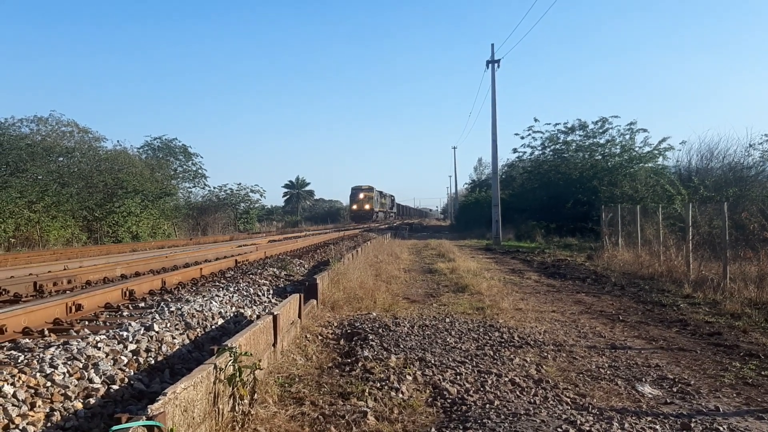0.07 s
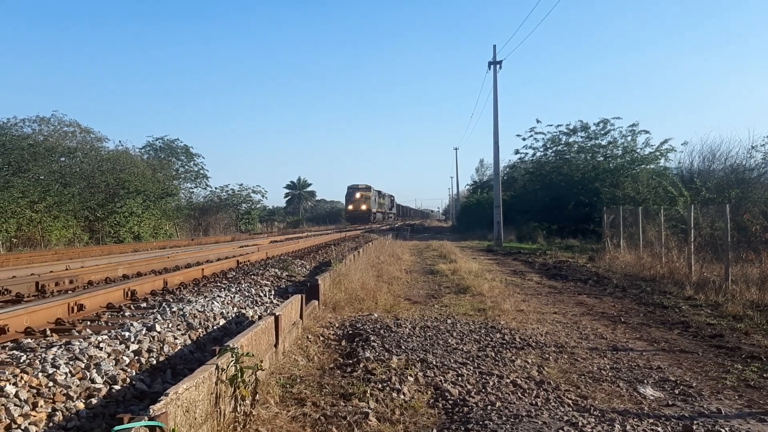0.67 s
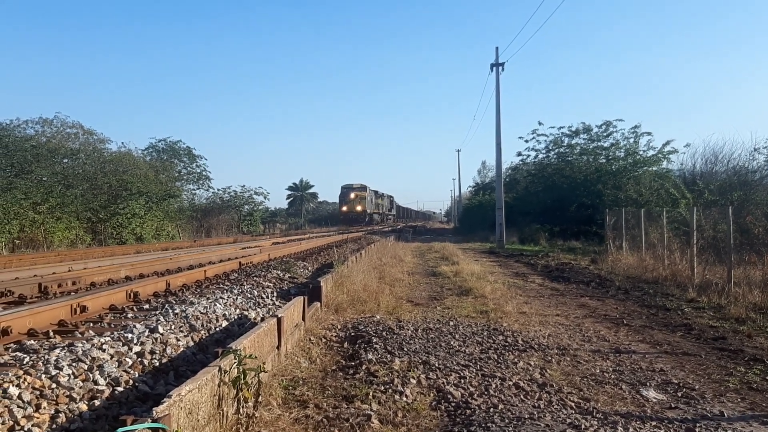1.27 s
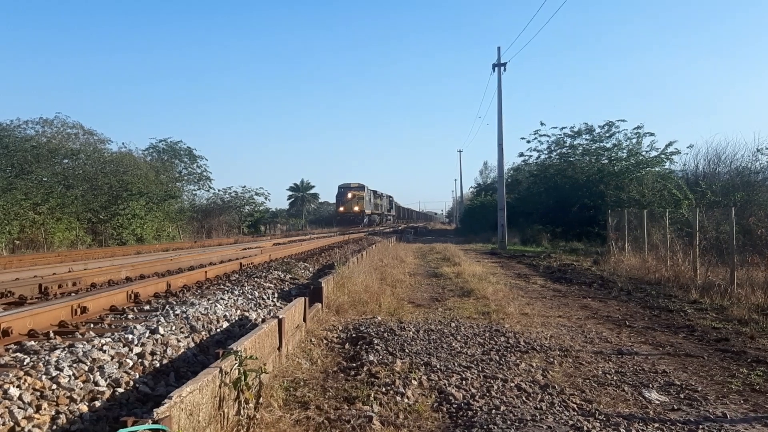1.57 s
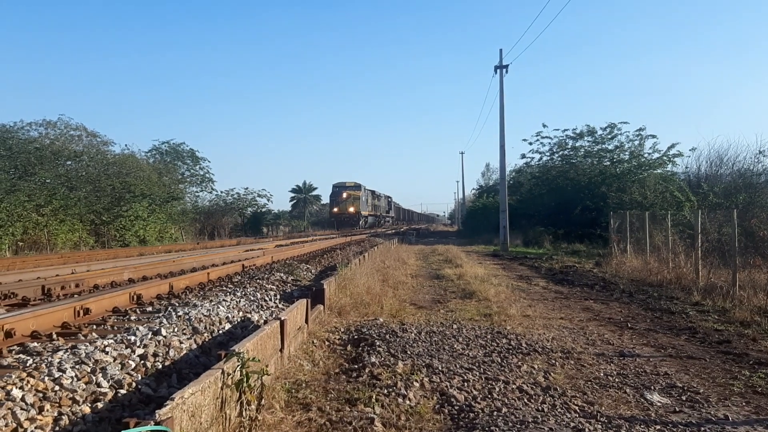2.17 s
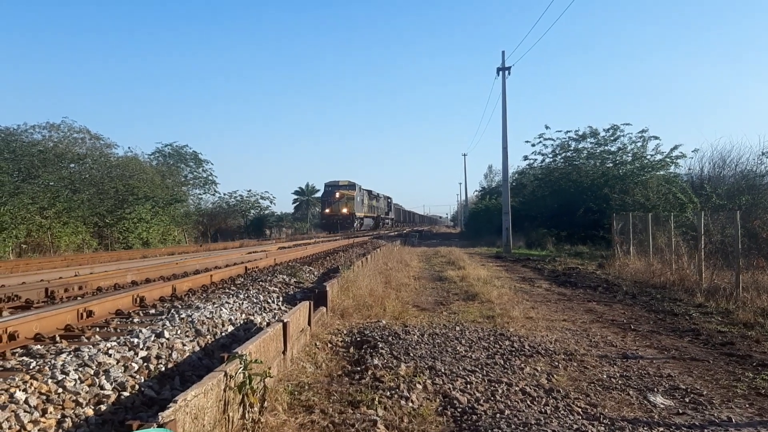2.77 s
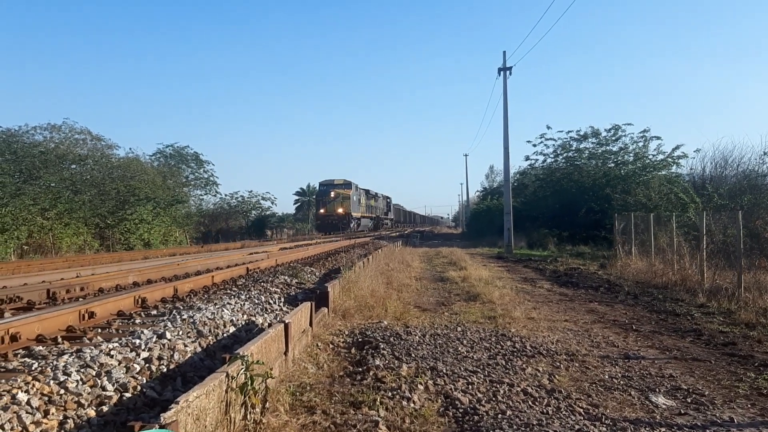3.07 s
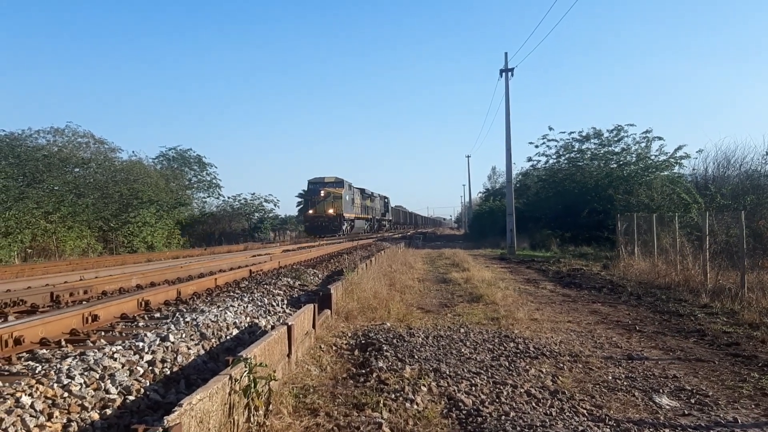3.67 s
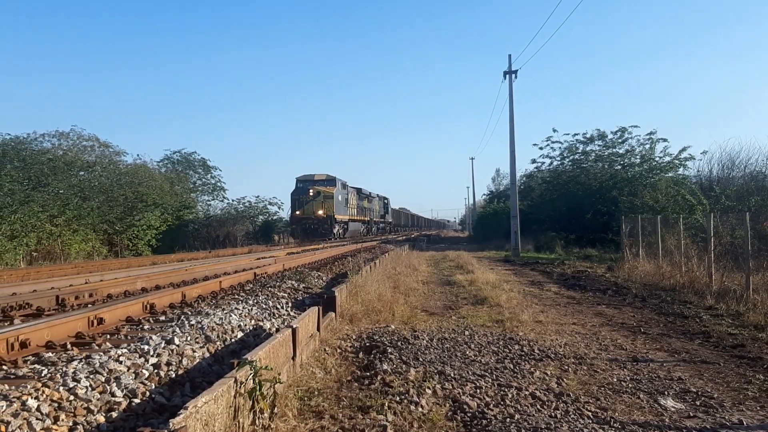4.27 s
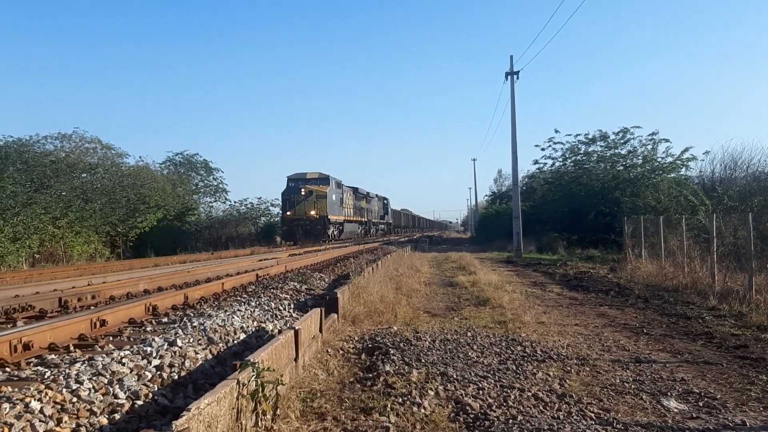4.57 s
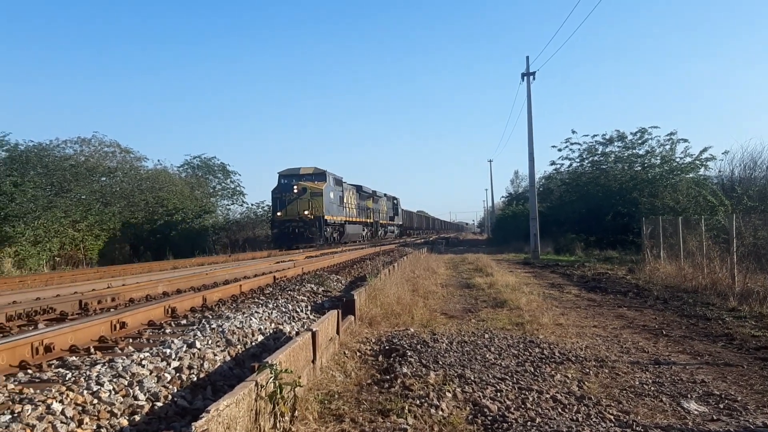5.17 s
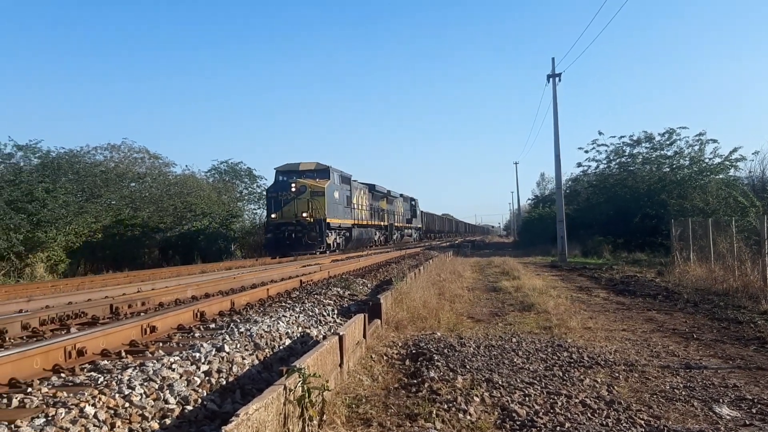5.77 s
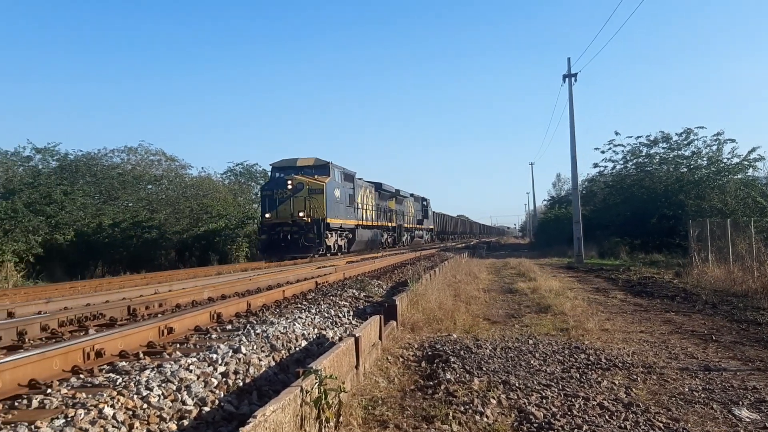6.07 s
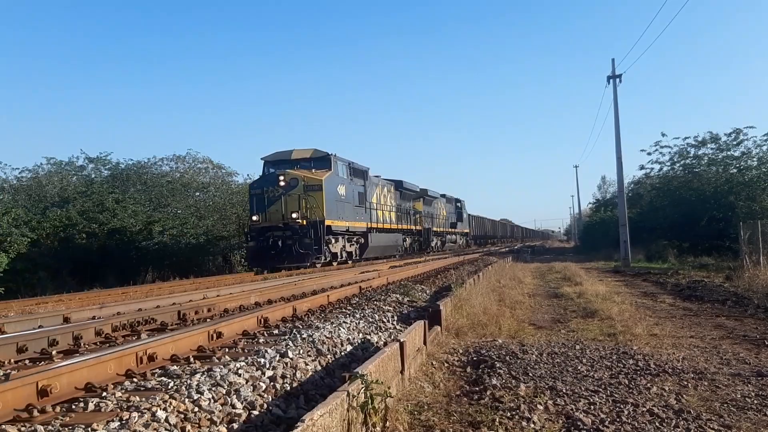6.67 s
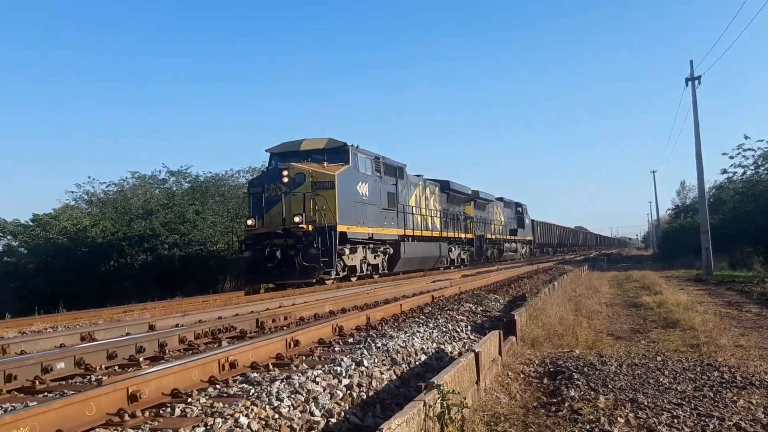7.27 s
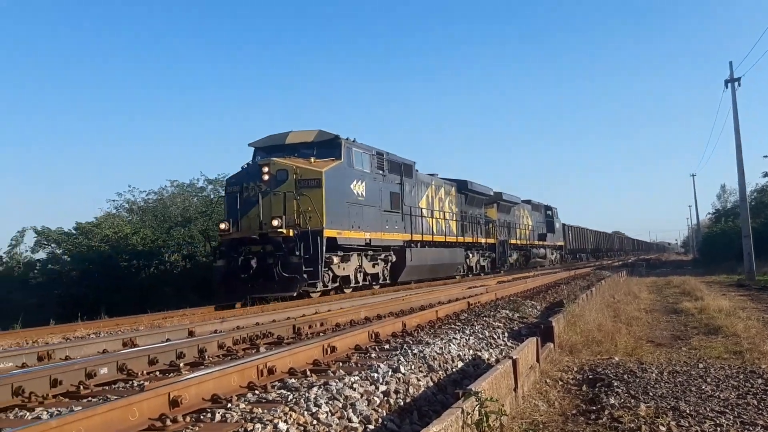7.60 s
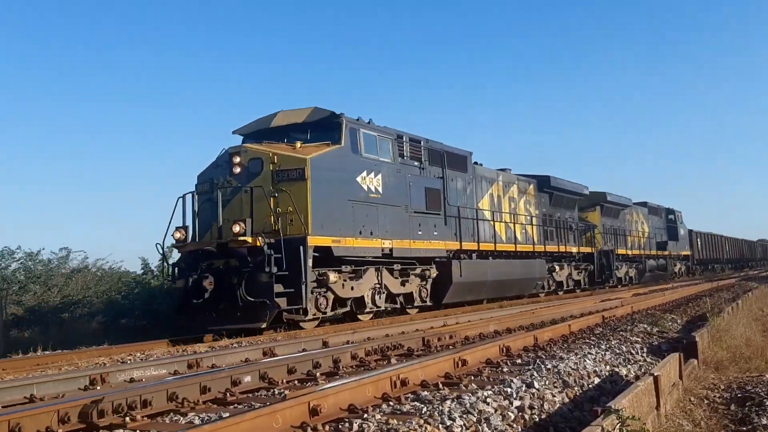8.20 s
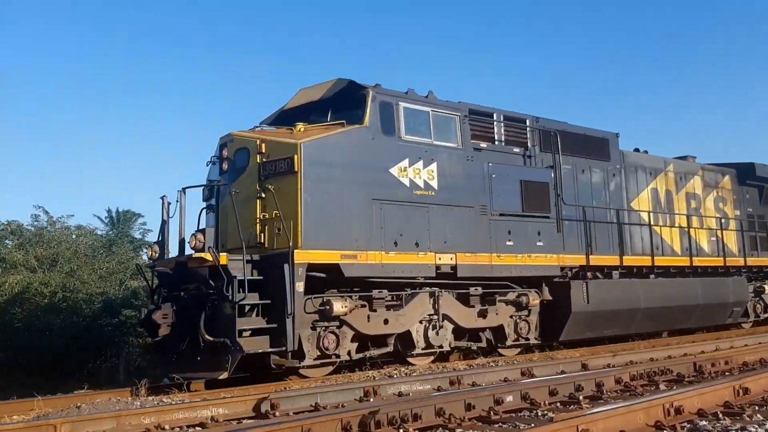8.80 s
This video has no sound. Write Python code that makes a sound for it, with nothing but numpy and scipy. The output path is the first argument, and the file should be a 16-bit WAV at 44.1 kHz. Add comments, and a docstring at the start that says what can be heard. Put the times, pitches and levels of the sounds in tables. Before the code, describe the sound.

A locomotive bell clangs at an even pace, distant and echoing at first, then close and sharp as a freight train nears. Beneath it, a throbbing diesel engine and roaring wheels grow louder. A short far-off air hiss comes first, then one faint bird chirp, and later rail ticks, a soft gear whine and a quick steel scrape. The microphone stands in the open by the track, rumbling and thumping in the wind.

```python
"""A diesel freight train rolls closer, its bell struck every 0.7 s and echoing off bushes and stones.
Its exhaust throbs, its wheels roar and wind buffets the microphone throughout. Right at the start
an air valve spits far off. Just after 3 s a bird chirps, and from 4.4 s the rails tick under the load.
The gears start to whine after 6 s, the bell is much louder from 6.9 s, and at 8.2 s a wheel scrapes."""
import sys
import numpy as np
from scipy import signal
from scipy.fft import rfft, irfft
from scipy.io import wavfile
from scipy.ndimage import map_coordinates

SR = 44100
rng = np.random.default_rng(int(sys.argv[2]) if len(sys.argv) > 2 else 0)


def generate_wav(sig):
    """Save sig (samples, or channels by samples) to the path in sys.argv[1] as 16-bit PCM at SR."""
    pcm = np.round(np.clip(np.atleast_2d(sig).T, -1, 1) * 32767).astype(np.int16)
    wavfile.write(sys.argv[1], SR, pcm)


N = 389844
TIME, FREQS = np.arange(N) / SR, np.fft.rfftfreq(N, 1 / SR)
NEAR_M = 20  # wheel and engine levels are set for this distance

# Bell strokes, each coloured by its path over the ground (hum and prime are the two lowest tones):
# start_s, level_db, hum_boost_db, prime_boost_db, treble_boost_db
BELL_STROKES = [(-.11, -42.5, 0.5, -7, -8), (.585, -48.5, 4, -3, 2), (1.287, -46.5, 0.5, 2, 1.5),
                (1.982, -43, -5, -1, -2.5), (2.675, -35.5, -6, -6.5, -2), (3.38, -35, 0, -8, 0),
                (4.076, -31.5, -0.5, -2.5, 2), (4.781, -30, 1, -2.5, 3), (5.485, -28.5, 7.5, 0, 1.5),
                (6.179, -27.5, 11, 1.5, 1.5), (6.887, -14.5, -1.5, -1.5, -2.5), (7.578, -12, -1, -0.5, 4),
                (8.283, -14.5, 6.5, 7.5, 1.9)]
# The tones that make up the bell's ring: pitch_hz
BELL_PITCHES = [966, 2014, 2257, 2246, 2310, 2420, 3430, 3915, 4109, 5298, 5695, 5776, 5904, 5959, 7412,
                8288, 10790]
# How each tone rings (t60 is the time to fade by 60 dB): level_db, t60_s, left_minus_right_db
BELL_RINGS = [(-19, 2.28, -1), (-2, 0.51, 0), (-1.5, 0.51, -1), (-18.5, 1.36, -20), (-1.5, 0.11, 10.5),
              (0.5, 0.025, 11), (-10.5, 0.32, 0), (-5.5, 0.57, -5), (-22, 0.34, -19), (-13.5, 0.085, -5),
              (-20, 0.12, -7), (-22, 0.3, -8), (-11.5, 0.17, -14), (-11, 0.21, 10), (-23, 0.1, -12),
              (-27.5, 0.14, -13), (-30, 0.13, 5)]
# Crowds of close overtones that die quickly: pitch_hz, width_hz, level_db
BELL_SHIMMER = [(2360, 160, -5), (3790, 820, 5.5), (5810, 450, 6), (7130, 230, -13), (8240, 120, -19.5),
                (10400, 810, -39)]
# Echoes from bushes; those behind the moving train sound lower: delay_s, pitch_ratio, level_db, t60_s
BUSH_ECHOES = [(0, 1, 0, .38), (.04, .996, -8, 1.0), (.12, .99, -12, 2.0)]


def bell(near_db=-13, shimmer_s=.039, clank_s=.0056, bloom_s=.021, flutter_hz=75, smear_hz=90):
    """A clapper clanks on bronze; the further off the bell, the more of it arrives as echoes."""
    out, t = np.zeros((2, N)), TIME[:SR]
    hz = np.array(BELL_PITCHES)
    tone_db, t60, tone_pan_db = np.transpose(BELL_RINGS)
    attack = 1 - np.exp(-t / .0015)
    ring = np.exp(2j * np.pi * hz[:, None] * t) * undb(-60 * t / t60[:, None]) * attack
    crowd = sum(abs(resonances([(f, width, 0)])) ** 2 * undb(db) for f, width, db in BELL_SHIMMER)
    shimmer = stereo_noise(crowd, .34)
    clank_spectrum_db = over_hz([(900, -40), (2200, 1), (5500, -11), (10500, -.5), (15000, -40)])
    clank = stereo_noise(undb(clank_spectrum_db), .27)
    for start_s, db, hum_db, prime_db, treble_db in BELL_STROKES:
        far_db = near_db - db  # how much weaker than a nearby stroke
        air_loss_db = .75 * far_db  # air dulls distant strokes
        stroke_db = tone_db + treble_db * (hz > 3000) - air_loss_db * (hz > 7000)
        stroke_db[:2] += hum_db, prime_db
        # shifting paths over the ground make each tone flutter
        depth = .27 + .01 * far_db
        sway = [np.exp(2j * np.pi * rng.random()) * (1 + depth * flutter(t, flutter_hz)) for _ in hz]
        tones = undb(stroke_db)[:, None] * np.imag(ring * np.array(sway))
        direct = pan(tone_pan_db) @ tones
        piece = rng.integers(N - SR) + np.arange(SR)  # fresh noise for each stroke
        shimmer_db = -11 + .16 * far_db + .5 * treble_db
        direct += undb(shimmer_db) * shimmer[:, piece] * np.exp(-t / shimmer_s) * attack
        direct += undb(-22 - 2 * air_loss_db) * clank[:, piece] * np.exp(-t / clank_s) * attack
        echo_gain = undb(-14 + .79 * far_db)
        gain = undb(db) * pan(1.5 - .2 * far_db) / np.sqrt(1 + .5 * echo_gain ** 2)
        # a far stroke swells in: its straight path is weak and paths over the stones arrive later
        bloom = 1 - np.clip(.11 * (far_db - 14), 0, .9) * np.exp(-t / bloom_s)
        add(out, start_s, gain * direct * bloom)
        for delay_s, pitch_ratio, echo_db, echo_t60 in BUSH_ECHOES:
            shifted = np.interp(t * pitch_ratio, t, direct.mean(axis=0))
            echo = undb(echo_db) * scatter(shifted, echo_t60)
            # the train's motion shifts the pitch differently for each bush, so the echoes waver
            smear = 1 + .38 * flutter(t, smear_hz).real
            add(out, start_s + delay_s, gain * echo_gain * echo * smear)
    return out


# The tone colour of wheels on rails, with faint microphone hiss at the very top: pitch_hz, level_db
WHEEL_SPECTRUM = [(250, 7.5), (400, 1.5), (560, 0.5), (750, 2.5), (1100, 0), (1500, -1.5), (1900, 3),
                  (2400, -4.5), (2900, -9), (3900, -7.5), (4800, -12), (6800, -19), (8200, -40.5),
                  (11000, -38.5), (15000, -38.5)]
# Rails sound along their whole length, so the treble differs between the ears: pitch_hz, likeness_ratio
WHEEL_LIKENESS = [(250, .85), (650, .9), (1400, .75), (2300, .4), (3000, .1), (6000, .05), (12000, 0)]
# The wheels' roar, ring, hiss and sizzle: near_level_db, ground_loss_db_per_m, far_wagons_db
WHEEL_BANDS = [(-32.5, .225, -57), (-35, .18, -65), (-35, 0.19, -55), (-56.5, 0.11, -84)]


def wheels(jolt_db=1.5, flicker_db=1.23, bushes_db=-2, clears_bushes_s=2.42):
    """Rough wheels shake the rails; the front of the train grows louder over the far wagons."""
    edges_hz = [200, 1000, 2300, 7800, 16000]
    out, shape, likeness = 0, undb(over_hz(WHEEL_SPECTRUM)), over_hz(WHEEL_LIKENESS)
    metres, jolts = distance(), wander(5)
    for low, high, (near_db, loss_db_per_m, wagons_db) in zip(edges_hz, edges_hz[1:], WHEEL_BANDS):
        band = 1 / np.sqrt((1 + (low / (FREQS + 1)) ** 16) * (1 + (FREQS / high) ** 16))
        roar = stereo_noise(shape * band, likeness)
        front = undb(near_db - loss_db_per_m * (metres - NEAR_M)) * NEAR_M / metres
        roughness = undb(jolt_db * jolts + flicker_db * wander(20))
        out += roar * np.hypot(front, undb(wagons_db)) * roughness
    behind_bushes = 1 - ramp(clears_bushes_s, .11)
    return out * undb(bushes_db * behind_bushes)


# The notes at which the exhaust pipe booms: pitch_hz, width_hz, level_db
EXHAUST_NOTES = [(68.8, 27.5, 6), (109, 24, -18), (162, 35, -15.5)]


def diesel(firing_hz=70, uneven_db=4, limp_db=4, throb_db=2, near_db=-33, db_per_doubling=5):
    """Uneven firings, strong and weak in turn, boom in the exhaust pipe and throb in the moving air."""
    cycles = np.cumsum(firing_hz * (1 + .085 * wander(12))) / SR
    firings = np.flatnonzero(np.diff(np.floor(cycles)))
    every_other = np.arange(len(firings)) % 2
    pulses = np.zeros(N)
    pulses[firings] = undb(uneven_db * rng.standard_normal(len(firings)) + limp_db * every_other)
    pipe = resonances(EXHAUST_NOTES) / (1 + (FREQS / 420) ** 4) / (1 + (44 / (FREQS + 1)) ** 6)
    throb = undb(throb_db * (wander(21) + wander(4.1)))
    boom = unit(colour(pulses * throb, pipe))
    db = near_db - db_per_doubling * np.log2(distance() / NEAR_M)
    return (boom + .26 * scatter(boom, t60_s=.21)) * undb(db) * pan(1)


# Ticks in the track: start_s, crack_db, grit_db
RAIL_TICKS = [(4.4194, -41, -80), (4.5087, -42, -80), (6.5194, -35.5, -68), (6.6314, -32.5, -62),
              (7.271, -34.5, -70), (7.325, -23.5, -55), (8.0298, -20.5, -52), (8.738, -24.5, -44)]
# The notes at which a rail rings: pitch_hz, width_hz, level_db
RAIL_NOTES = [(1976, 51, 7), (2520, 200, 2.5), (4950, 340, -2), (11000, 2900, -24)]


def rail_ticks(decay_s=.012, rise_s=.0011):
    """Rails and their fastenings crack briefly as they take up the load."""
    out, t = np.zeros((2, N)), TIME[:SR // 8]
    steel = stereo_noise(abs(resonances(RAIL_NOTES)) / (1 + (FREQS / 9000) ** 2), .75)
    grit = stereo_noise(abs(resonances([(11300, 4000, 0)])) ** 2, .1)
    fade = np.exp(-t / decay_s) * (1 - np.exp(-t / rise_s))
    for start_s, crack_db, grit_db in RAIL_TICKS:
        now = slice(int(start_s * SR), int(start_s * SR) + len(t))
        crack = undb(crack_db) * steel[:, now] + undb(grit_db) * grit[:, now]
        add(out, start_s, crack * fade[:crack.shape[1]])
    return out


# The bright peaks of scraping steel: pitch_hz, width_hz, half_level_db
SCRAPE_PEAKS = [(4600, 1900, 7), (9700, 2000, -11)]


def wheel_scrape(peak_s=8.18, level_db=-39.5, grip_db=3):
    """The lip of a wheel slips along the rail in a brief, uneven hiss."""
    hiss = stereo_noise(abs(resonances(SCRAPE_PEAKS)) ** 2, .2)
    return hiss * undb(level_db + grip_db * wander(40)) * swell(peak_s, half_s=.07)


def gears(start_s=6.25, start_hz=732, rise_hz_per_s=34, top_hz=790, level_db=-48, waver_db=6):
    """Gear teeth driving the axles sing a thin, unsteady note that climbs and levels off."""
    hz = np.minimum(start_hz + rise_hz_per_s * (TIME - start_s), top_hz)
    phase = 2 * np.pi * np.cumsum(hz * (1 + .0053 * wander(22.3))) / SR
    return np.sin(phase) * undb(level_db + waver_db * wander(8.3)) * ramp(start_s, .048)


# The breeze on the microphone: time_s, level_db, left_minus_right_db
WIND_STRENGTH = [(0, -42, 1), (.8, -37, 0), (1.4, -40.5, 1.5), (2.45, -39, 4), (2.8, -35, 7.5),
                 (3.4, -35.5, 3), (4.05, -37.5, 0), (5.05, -33, 3.5), (5.4, -30.5, 12), (5.85, -28.5, 8.5),
                 (6.3, -30.5, 5.5), (7.2, -31.5, 4), (8.84, -32, 0)]
# The tone colour of its rumble: pitch_hz, level_db
WIND_RUMBLE = [(20, -33), (37, -14), (55, -4.5), (90, 0), (160, 2), (210, -6.5), (300, -13), (420, -27),
               (700, -37), (1500, -90)]
# Single swirls of air that thump on the microphone: peak_s, level_db, left_minus_right_db
WIND_THUMPS = [(1.011, -29.5, -10), (1.667, -30, 2), (2.02, -30, -7.5), (2.29, -32, 0), (3.281, -28.5, 12),
               (3.49, -30, -5), (3.62, -30.5, 10), (4.58, -30.5, 3), (5.252, -23.5, 20), (5.386, -24.5, 14),
               (5.56, -27.5, 14), (5.956, -25.5, 4), (6.061, -19, -15)]


def wind(buffet_db=1.82, one_side_db=1.5, calm_db=-34.5, brighter_db_per_octave=3):
    """Big swirls of air hit both sides of the microphone, small ones only one; gusts sound higher."""
    db, pan_db = curves(WIND_STRENGTH)
    spectrum_db, likeness = over_hz(WIND_RUMBLE), over_hz([(40, .6), (90, .77), (220, .53)])
    tilt_db = brighter_db_per_octave * np.log2(np.clip(FREQS, 20, 330))
    slow = stereo_noise(undb(spectrum_db), likeness)
    fast = stereo_noise(undb(spectrum_db + tilt_db), likeness)
    fast_share = np.clip(.23 * (db - calm_db), 0, 1)
    rumble = slow * np.sqrt(1 - fast_share) + fast * np.sqrt(fast_share)
    sides_db = one_side_db * np.array([wander(29), wander(24)])
    breeze = rumble * undb(db + buffet_db * wander(31) + sides_db) * pan(pan_db)
    thumps = sum(undb(thump_db) * pan(side_db) * swell(peak_s, half_s=.017)
                 for peak_s, thump_db, side_db in WIND_THUMPS)
    return breeze + fast * thumps


# The tone colour of escaping air: pitch_hz, level_db
VALVE_SPECTRUM = [(410, -34), (700, -6), (824, -20), (855, -19), (1170, -3), (1560, -14), (1980, -3),
                  (2640, -6), (3110, -2), (5400, -4.5), (14000, -48)]


def air_valve(opens_s=.12, peak_s=.25, peak_db=-37, rise_db_per_s=111, fall_db_per_s=82):
    """A short spit of compressed air, softened by distance, swells and dies away."""
    since_peak = TIME - peak_s
    db = peak_db + np.minimum(rise_db_per_s * since_peak, -fall_db_per_s * since_peak)
    hiss = stereo_noise(undb(over_hz(VALVE_SPECTRUM)), .27)
    return hiss * undb(db) * ramp(opens_s, .02)


# The tune of the bird's chirp: time_s, pitch_hz
BIRD_TUNE = [(3.155, 2700), (3.18, 2870), (3.215, 2880), (3.255, 2990), (3.275, 3120), (3.32, 2920)]


def bird(level_db=-50, upper_ratio=1.25, upper_db=-7, warble_db=2, fade_s=.03):
    """One rising, warbling chirp; a weaker second voice above it drops out first."""
    start_s, end_s = BIRD_TUNE[0][0], BIRD_TUNE[-1][0]
    hz = curves(BIRD_TUNE)[0] * (1 + .006 * wander(200))
    phase = 2 * np.pi * np.cumsum(hz) / SR
    sounding = ramp(start_s, fade_s) - ramp(end_s - fade_s, fade_s)
    upper_fade = np.sqrt(1 - ramp(start_s, end_s - start_s - fade_s))
    upper = undb(upper_db) * upper_fade * np.sin(upper_ratio * phase)
    return (np.sin(phase) + upper) * undb(level_db + warble_db * wander(60)) * sounding


def distance(speed_m_per_s=10.04, passes_s=10.014, track_away_m=15.2):
    """Metres to the steadily rolling engine; the sound ends before it passes."""
    return np.hypot(speed_m_per_s * (passes_s - TIME), track_away_m)


def scatter(x, t60_s, rise_s=.007, spread=.71):
    """A blur of many small echoes, new at every place along the track."""
    t = TIME[:SR]
    mid, side = rng.standard_normal((2, len(t))) * undb(-60 * t / t60_s) * (1 - np.exp(-t / rise_s))
    echoes = np.array([mid + spread * side, mid - spread * side])
    echoes /= np.sqrt(np.sum(echoes ** 2) / 2)
    return signal.fftconvolve(x[None], echoes, axes=1)[:, :len(x)]


def undb(db):
    """Turn decibels into a number to multiply by."""
    return 10 ** (np.asarray(db) / 20)


def unit(x):
    """Scale to an average power of 1."""
    return x / np.sqrt(np.mean(x ** 2))


def curves(table):
    """Turn each column after time_s into a curve over time."""
    times, *columns = np.transpose(table)
    return [np.interp(TIME, times, column) for column in columns]


def over_hz(points):
    """Join (pitch_hz, value) points, giving each octave equal room."""
    hz, value = np.transpose(points)
    return np.interp(np.log(FREQS + 1), np.log(hz), value)


def colour(x, gain):
    """Turn each frequency up or down by its gain."""
    return irfft(rfft(x) * gain, N)


def resonances(notes):
    """A filter that rings at each (pitch_hz, width_hz, level_db)."""
    return sum(undb(db) / (1 + 1j * (FREQS ** 2 - hz ** 2) / (width * FREQS + 1e-9))
               for hz, width, db in notes)


def pan(db):
    """Left and right gains that make the left louder by db at the same total power."""
    gains = undb(np.array([[.5], [-.5]]) * db)
    return gains / np.sqrt(np.mean(gains ** 2, axis=0))


def wander(rate_hz):
    """A smooth random drift with a typical size of 1."""
    return unit(colour(rng.standard_normal(N), np.exp(-(FREQS / rate_hz) ** 2)))


def flutter(t, rate_hz):
    """A random wobble of level and phase, as complex numbers."""
    real, imaginary = rng.standard_normal((2, 400))
    return np.interp(t * rate_hz, np.arange(len(real)), real + 1j * imaginary) * np.sqrt(3 / 4)


def stereo_noise(gain, likeness):
    """Filtered noise for two ears: likeness 1 is the same in both, 0 is unrelated."""
    likeness = np.clip(likeness, -1, 1)
    mid = colour(rng.standard_normal(N), gain * np.sqrt(1 + likeness))
    side = colour(rng.standard_normal(N), gain * np.sqrt(1 - likeness))
    return unit(np.array([mid + side, mid - side]))


def add(out, start_s, sound):
    """Mix a sound in at start_s, dropping what does not fit."""
    start = int(start_s * SR)
    first, last = max(start, 0), min(start + sound.shape[1], N)
    out[:, first:last] += sound[:, first - start:last - start]


def ramp(start_s, length_s):
    """A fade from 0 to 1."""
    return np.clip((TIME - start_s) / length_s, 0, 1)


def swell(peak_s, half_s):
    """A smooth rise and fall around peak_s."""
    return np.exp(-((TIME - peak_s) / half_s) ** 2)


# The train's direction, heard as a delay at the left ear: time_s, delay_s
LEFT_EAR_DELAY = [(0, .00012), (4.6, .00014), (5.4, .00002), (7.5, .00003), (8.84, .00008)]


def scene():
    """Everything heard beside the track; the train reaches the right ear first."""
    left, right = bell() + wheels() + wheel_scrape() + gears() + diesel() + rail_ticks() + air_valve()
    delay_s = curves(LEFT_EAR_DELAY)[0]
    left = map_coordinates(left, [(TIME - delay_s) * SR], order=3)
    return np.array([left, right]) + wind() + bird()


def record(dry, top_hz=15800):
    """Clip peaks at full scale and cut the highest treble."""
    treble_cut = signal.ellip(10, .2, 80, top_hz, fs=SR, output="sos")
    return signal.sosfilt(treble_cut, np.clip(dry, -1, 1))


dry = scene()
out = record(dry)
generate_wav(out)
```